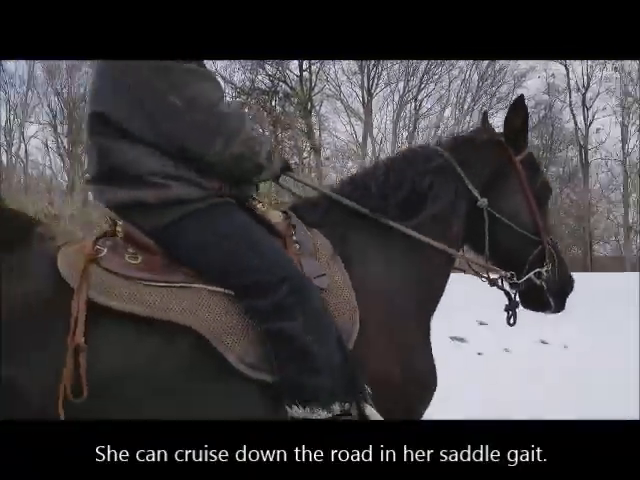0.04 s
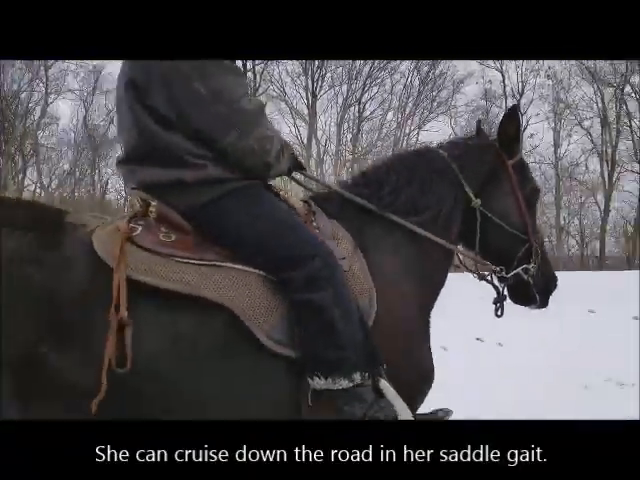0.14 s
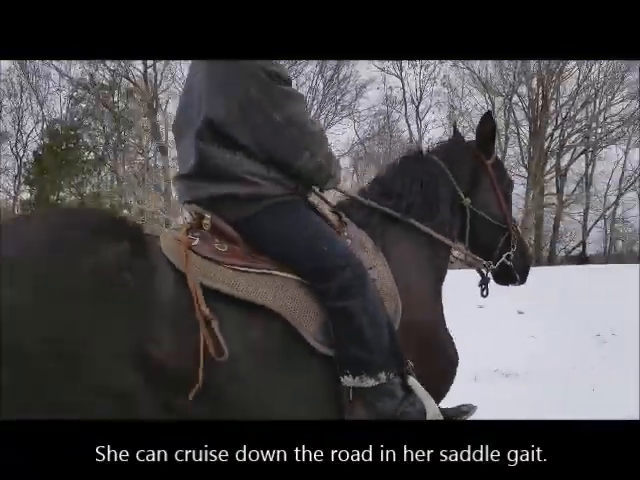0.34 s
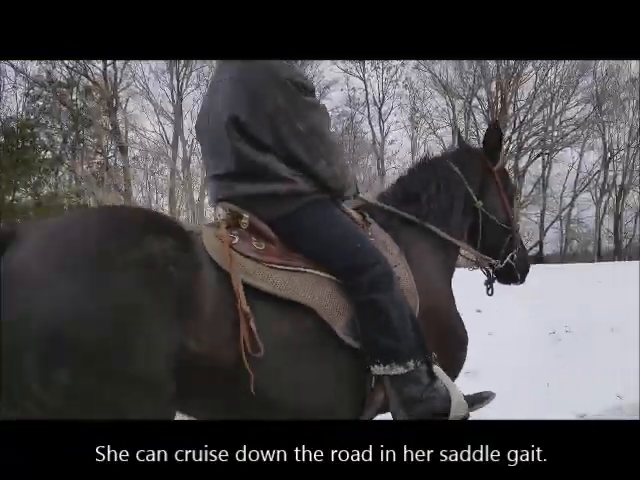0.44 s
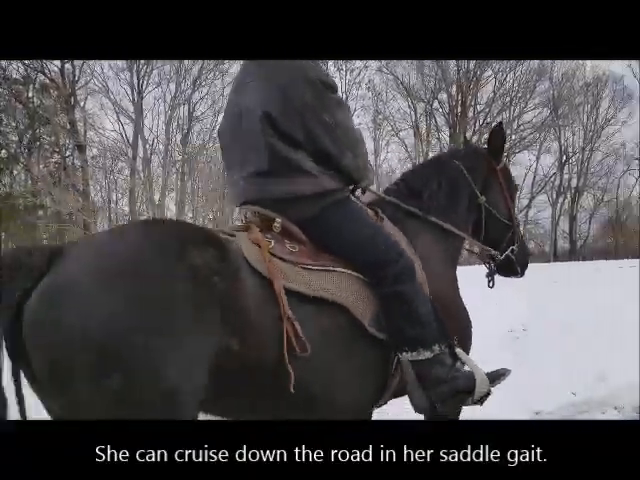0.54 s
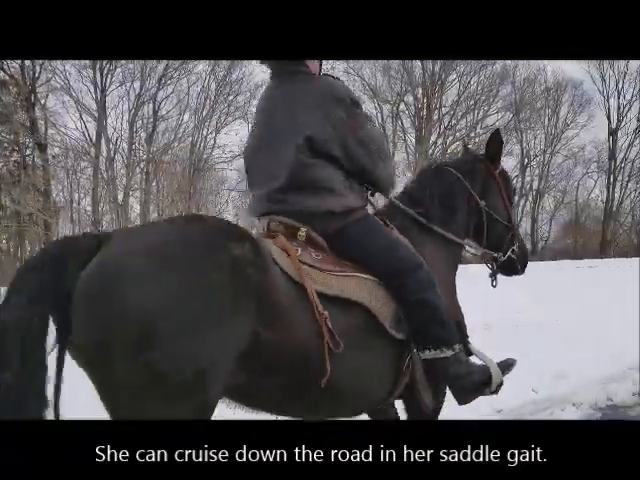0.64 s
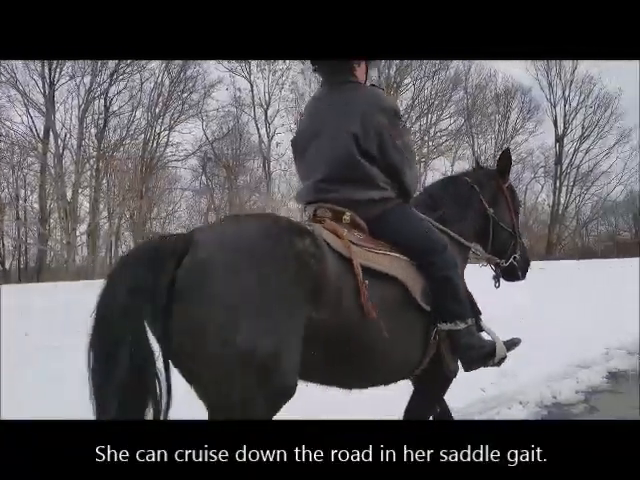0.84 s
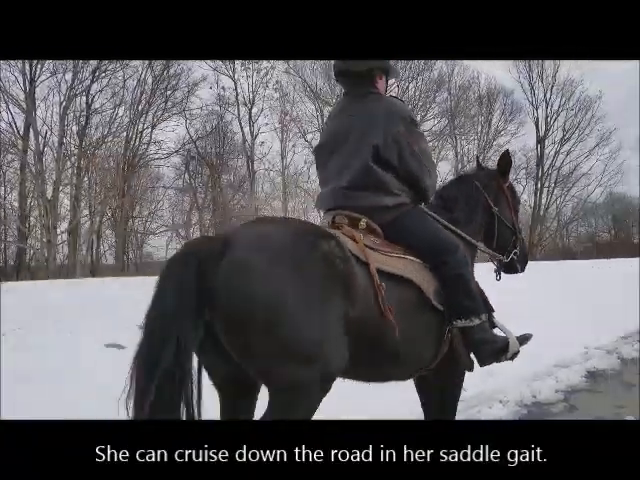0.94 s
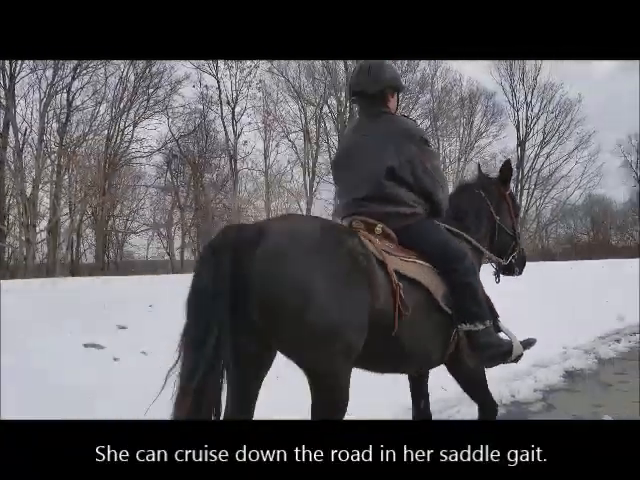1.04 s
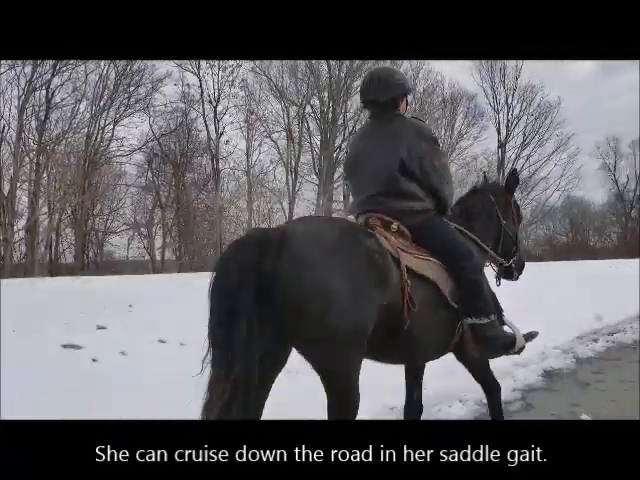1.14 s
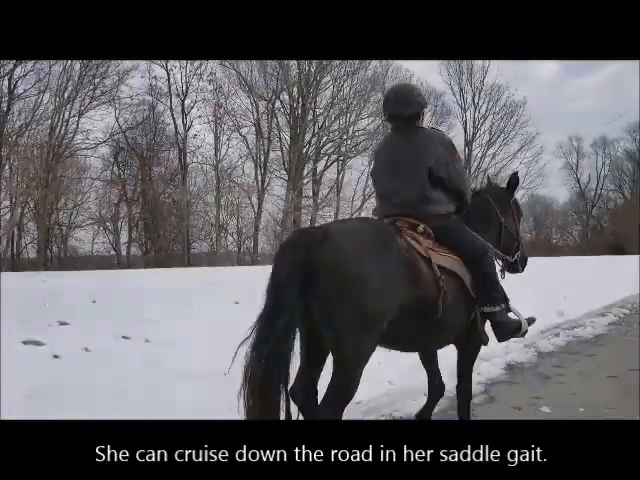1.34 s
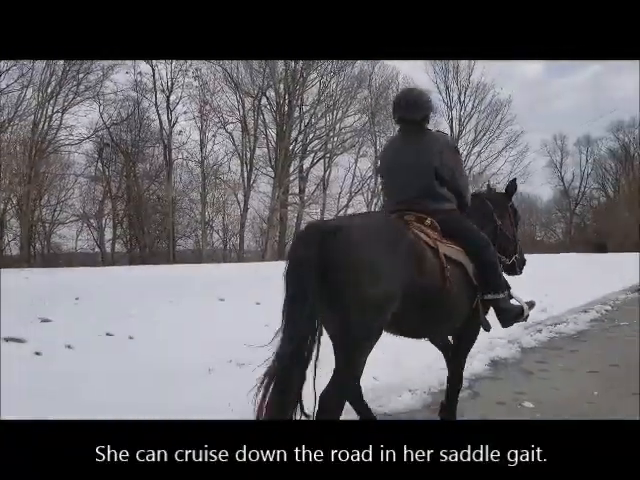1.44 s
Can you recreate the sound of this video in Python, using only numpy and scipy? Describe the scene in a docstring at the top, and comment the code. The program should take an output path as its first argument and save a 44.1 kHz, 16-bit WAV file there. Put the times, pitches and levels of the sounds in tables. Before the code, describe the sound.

A horse walks close by on pavement, hooves clopping in pairs with light gritty crunches.

```python
"""A gaited horse passes close by on a paved road between snowy fields, its hooves landing in four pairs.
Each hoof touches, then slaps flat: the hollow hoof rings, the sole knocks, the weight thuds.
Road grit crackles under the shoes, and one hoof scuffs through it. The saddle rustles, coat and
leather swish, and a metal clasp tinkles on the reins. Road and trees throw back a faint tail.
Underneath lies a bed of outdoor hiss and low rumble."""
import sys
import numpy as np
from scipy import signal
from scipy.fft import rfft, irfft, next_fast_len
from scipy.io import wavfile
from scipy.ndimage import map_coordinates

SR = 44100
rng = np.random.default_rng(int(sys.argv[2]) if len(sys.argv) > 2 else 0)


def output_pcm(signal):
    """Save a mono or channel-first signal as 16-bit PCM at the path in sys.argv[1].

    Samples are clipped to [-1, 1] before scaling.
    """
    pcm = np.clip(np.atleast_2d(signal).T, -1, 1) * 32767
    wavfile.write(sys.argv[1], SR, np.round(pcm).astype(np.int16))


N = 66150

# EQ curves of the noise layers (frequency [Hz], gain [dB])
HISS_EQ = [(30, -2.5), (100, -2), (200, -6), (400, -16), (650, -17.5), (1000, -25), (1900, -28),
           (2700, -31), (5200, -17), (8400, -26), (11000, -25), (12500, -29.5), (16000, -29.5)]
RUMBLE_EQ = [(30, -28.5), (65, -12.5), (82, -12.5), (100, -24), (200, -39), (600, -76.5)]
RUSTLE_EQ = [(80, -24.5), (170, -12.5), (300, -7.5), (450, -12.5), (700, -13), (2000, -22), (5000, -39),
             (15000, -34.5)]
SWISH_EQ = [(200, -23.5), (500, 1.5), (1300, -7), (2000, -4), (3200, -7.5), (5000, -6.5), (15000, -32)]
GRIT_EQ = [(300, -17), (900, -8.5), (1700, -7.5), (2700, -11.5), (4400, -2), (7500, -5), (11000, -11),
           (15500, -17)]
SHUDDER_EQ = [(40, -20), (80, -11.5), (150, -4.5), (290, -0.5), (480, -10.5), (1000, -14), (2000, -21.5),
              (5000, -38.5), (15000, -69.5)]
CRACK_EQ = [(100, -7), (450, -4.5), (900, -1.5), (1350, 3.5), (1750, -0.5), (2300, 2.5), (2900, -9.5),
            (6000, -18), (10000, -26.5), (16000, -37.5)]
# fader rides of the background layers (time [s], level [dB])
HISS_FADER = [(0, -55.5), (0.42, -57.5), (0.8, -56.5), (1.1, -57), (1.48, -54)]
RUMBLE_FADER = [(0, -67), (0.8, -60), (1.1, -57.5), (1.35, -50.5), (1.48, -68)]
RUSTLE_FADER = [(0, -58), (0.11, -50.5), (0.2, -57), (0.33, -56.5), (0.42, -76.5), (0.7, -78)]
SWISH_FADER = [(0, -62), (0.18, -55.5), (0.36, -59), (0.55, -59.5), (0.66, -51), (0.74, -70), (0.85, -59.5),
               (1.0, -58), (1.15, -63.5), (1.33, -56), (1.48, -76.5)]
# stereo image of hiss, rustle and swish (frequency [Hz], left-right correlation [-1 to 1])
STEREO_IMAGE = [(60, 0.81), (180, 0.79), (550, 0.57), (1650, 0.065), (4970, -0.12), (15000, -0.26)]
# taps of the rein clasp (time [s], level [dB])
CLASP_TAPS = [(0.066, -61.5), (0.151, -71.5), (0.251, -67), (0.278, -60), (0.462, -68), (0.515, -62),
              (0.622, -66), (0.653, -65), (0.741, -69)]
# partials of the clasp (frequency [Hz], gain [dB], t60 [s])
CLASP_MODES = [(14300, 4.5, .17), (15100, -14, .1)]
# decay of the tail from the trees (frequency [Hz], t60 [s])
TAIL_DECAY = [(100, 0.53), (400, 0.6), (1100, .22), (3000, 0.63), (12000, 0.05)]
# pan of the horse (time [s], hoof left over right [dB], grit left over right [dB], left lead [ms])
HORSE_PAN = [(0.2, 0.6, 17, 0.12), (0.6, -0.5, 2.5, 0.11), (0.9, 0, -0.5, -0.063), (1.2, -1, 0, -.14),
             (1.45, 3, -8.5, -0.099)]
# bursts of grit underfoot (time [s], level [dB], attack [s], t60 [s])
GRIT_BURSTS = [(0.182, -45.5, 0.0028, 0.023), (0.2184, -49.5, 0.00065, 0.082),
               (0.2548, -49.5, 0.00082, .03), (0.2873, -47, 0.00045, 0.019), (0.3486, -47, 0.00028, 0.021),
               (0.5041, -44, 0.0011, 0.0187), (0.514, -44.5, 0.0038, 0.11), (0.6140, -56, .002, .15),
               (0.6731, -42.5, 0.0011, 0.022), (0.7717, -51, 0.00079, 0.042), (0.8613, -47, 0.00044, 0.015),
               (0.8835, -34.5, .001, 0.043), (0.9562, -56, 0.00034, 0.018), (0.9741, -49.5, 0.00035, 0.01),
               (0.988, -44, 0.00049, 0.018), (1.2000, -21, 0.00021, 0.04), (1.2036, -26, 0.00055, .016),
               (1.2200, -37, 0.0047, .09), (1.2735, -42.5, .004, .09), (1.287, -45.5, 0.0052, 0.14),
               (1.3330, -43.5, .0003, .022), (1.3600, -43, 0.0033, 0.093), (1.3763, -40, .001, 0.018),
               (1.4739, -43, .003, 0.025)]
# resonances of the scraped shoe (frequency [Hz], width [Hz], gain [dB])
SHOE_MODES = [(1690, 310, -13.5), (3590, 320, -3.5), (4466, 130, 1), (5240, 360, -0.5), (7650, 340, -4.5),
              (10660, 370, -11.5)]
# dead modes of the sole (pitch [x knock pitch], gain [dB], time to peak [s])
SOLE_MODES = [(1, -6, 0.0015), (.36, -10.5, 0.0027)]
# modes of the hollow hoof (pitch [x ring pitch], gain [dB], base t60 [s])
HOOF_MODES = [(1, 2, 0.027), (.68, -34, .028), (1.28, -13, 0.009), (1.57, -41, 0.036), (2.15, -22.5, .02)]
# hoof hits on the road (time [s], ring [dB], ring pitch [Hz], ring length [x base t60], knock [dB],
# knock pitch [Hz], thud [dB], settled thud pitch [Hz], crack [dB])
HOOF_HITS = [ (0.2109, -32.5, 1150, 1.2, -25, 900, -37.5, 178, -32.5),
             (0.2197, -4, 1081, 1.12, -11.5, 868, -17, 127.8, -22),
             (0.2570, -41, 1200, .7, -42.5, 750, -46, 125, -54),
             (0.2733, -46.5, 1120, 0.68, -20.5, 700, -23.5, 250.7, -54),
             (0.2772, -19, 1230, 0.64, -61, 800, -28.5, 100, -38),
             (0.2855, -13.5, 1175, 0.78, -21, 854, -32, 97, -32.5),
             (0.502, -46, 1100, 0.51, -38, 800, -43.5, 130, -48),
             (0.5190, -29.5, 1180, 0.44, -26, 740, -37.5, 151, -39),
             (0.5301, -30.5, 1100, 0.43, -29, 680, -25, 114, -48.5),
             (0.5660, -62.5, 1100, 0.67, -60, 700, -43, 115, -71),
             (0.6011, -24, 1293, 0.66, -24, 850, -34, 220, -36.5),
             (0.6137, -18.5, 1170, .5, -14.5, 790, -22, 118.6, -27.5),
             (0.6445, -64, 1200, .6, -55, 700, -39, 125, -43),
             (0.87, -47.5, 1150, 1.1, -33, 800, -38, 180, -41.5),
             (0.8829, -7, 1067, 0.84, -13, 838, -19.5, 114.5, -22),
             (0.9478, -28, 1207, 1, -17.5, 630, -27.5, 203, -45.5),
             (0.9560, -16.5, 1170, 0.68, -42, 700, -30.5, 131, -27),
             (1.2099, -45, 1160, 0.68, -23, 384, -28.5, 167, -39),
             (1.2239, -38.5, 1090, 0.83, -24, 510, -29, 89.7, -31.5),
             (1.2281, -23.5, 1110, 1, -22.5, 864, -32.5, 174, -34),
             (1.2388, -50.5, 1240, .5, -45, 810, -55.5, 101, -31),
             (1.2906, -39, 1364, 1.5, -26.5, 528, -35.5, 205, -40),
             (1.2990, -48, 1300, 0.54, -46, 780, -36, 166.6, -53),
             (1.3345, -62.5, 1110, 0.68, -63.5, 810, -69, 85.5, -43.5)]
# tone tilt between the microphone ports (frequency [Hz], left over right [dB])
PORT_TILT = [(100, 0), (800, 0), (1300, 1), (2000, 12.5), (2500, 1), (3100, 4), (4400, 2.5), (5500, 5.5),
             (6800, -9.5), (8200, -2), (9600, -7.5), (11000, -12), (12500, -1), (14000, 7), (15500, 5.5)]

CLASP_RIGHT_DB = -11.5
TAIL_DB, SCATTER_DB = -30, -25
SHOE_DB, GRAIN_DEPTH_DB, GRAINS_PER_S = 0.5, 4.5, 4700
THUD_SAG, THUD_SAG_S, SHUDDER_DB = .7, .004, -10  # the thud starts 70% sharp
RING_BEND, RING_BEND_S, RING_WAVER_RAD = .55, .00041, .14  # the ring starts 55% flat
LOW_CUT_HZ, TOP_HZ = 45, 15950
HIT_N = SR // 6  # samples in a one-shot


def amp(db):
    """Decibels to gain."""
    return 10 ** (np.asarray(db) / 20)


def unit(x):
    """Scale to rms 1."""
    return x / np.sqrt(np.mean(x ** 2) + 1e-20)


def along(points, hz):
    """Read (frequency [Hz], value) points on a log axis."""
    freqs, values = np.transpose(points)
    return np.interp(np.log(hz + 1), np.log(freqs + 1), values)


def ride(fader):
    """A fader's level in dB at every sample."""
    return np.interp(np.arange(N) / SR, *np.transpose(fader))


def wobble(rate, size):
    """A smooth random curve, rate knots a second."""
    return map_coordinates(rng.standard_normal(size), [np.arange(size) * rate / SR], mode="wrap")


def filtered(x, response):
    """Filter x with a complex frequency response."""
    n = x.shape[-1]
    padded = next_fast_len(n + SR // 8)
    return irfft(rfft(x, padded) * response(np.fft.rfftfreq(padded, 1 / SR)), padded)[..., :n]


def strike(t, attack, t60):
    """Envelope of a hard hit: quick rise, exponential fall."""
    return (1 - np.exp(-t / attack)) * np.exp(-np.log(1000) * t / t60)


def swell(t, peak_s):
    """Envelope of a cushioned hit: soft start, 1 at peak_s, quick end."""
    return (t / peak_s) ** 2 * np.exp(2 - 2 * t / peak_s)


def eq_noise(eq, shape):
    """Coloured noise of rms 1."""
    return unit(filtered(rng.standard_normal(shape), lambda hz: amp(along(eq, hz))))


def stereo_noise(eq, image=STEREO_IMAGE):
    """Coloured noise of rms 1, its width set band by band."""
    def mid_side_gains(hz):
        angle = np.arccos(np.clip(along(image, hz), -1, 1)) / 2
        return amp(along(eq, hz)) * [np.cos(angle), np.sin(angle)]
    mid, side = filtered(rng.standard_normal((2, N)), mid_side_gains)
    return unit(np.array([mid + side, mid - side]))


def pan_in(out, x, at, gritty):
    """Mix in a one-shot, panned by level and delay to where the horse then is."""
    times, *columns = np.transpose(HORSE_PAN)
    hoof_db, grit_db, lead_ms = [np.interp(at, times, column) for column in columns]
    sides, preroll = np.array([[.5], [-.5]]), SR // 200
    gains = amp(sides * (grit_db if gritty else hoof_db))
    padded = np.pad(x, [(0, 0), (preroll, 0)])
    pair = filtered(padded, lambda hz: gains * np.exp(2j * np.pi * hz * sides * lead_ms / 1000))
    start = round(at * SR) - preroll
    out[:, start:start + pair.shape[1]] += pair[:, :N - start]


def outdoor_bed():
    """Faint, wide hiss over a low, almost mono rumble."""
    hiss = amp(ride(HISS_FADER) + 0.46 * wobble(39.47, N)) * stereo_noise(HISS_EQ)
    rumble = amp(ride(RUMBLE_FADER)) * stereo_noise(RUMBLE_EQ, image=[(80, .99)])
    return hiss + rumble


def saddle_rustle():
    """The saddle gives a dark, fluttering rustle at the start."""
    return amp(ride(RUSTLE_FADER) + 2.5 * wobble(100, N)) * stereo_noise(RUSTLE_EQ)


def coat_swish():
    """Coat and leather rub in soft midrange swells."""
    return amp(ride(SWISH_FADER) + 2.4 * wobble(150, N)) * stereo_noise(SWISH_EQ)


def rein_clasp():
    """The metal clasp rings thinly on the left as the head nods."""
    out, t = np.zeros(N), np.arange(HIT_N) / SR
    for at, tap_db in CLASP_TAPS:
        for hz, db, t60 in CLASP_MODES:
            partial = np.sin(2 * np.pi * hz * t + .5 * wobble(200, HIT_N))
            out[round(at * SR):][:HIT_N] += amp(tap_db + db) * strike(t, 0.0045, t60) * partial
    return np.array([out, amp(CLASP_RIGHT_DB) * out])


def reflections(x):
    """Reverb return: a quick scatter off road and horse, and a faint tail from the trees."""
    freqs, t, bands = signal.stft(rng.standard_normal((2, SR // 2)), SR, nperseg=256)
    decay = np.exp(-np.log(1000) * t / along(TAIL_DECAY, freqs)[:, None])
    tail = signal.istft(bands * decay, SR, nperseg=256)[1]
    scatter = rng.standard_normal(tail.shape) * strike(np.arange(tail.shape[1]) / SR, .012, t60=.045)
    impulse = amp(TAIL_DB) * tail / np.linalg.norm(tail[0])
    impulse += amp(SCATTER_DB) * scatter / np.linalg.norm(scatter[0])
    mid, side = impulse[0], filtered(impulse[1], lambda hz: hz / (hz + 900))  # lows stay centred
    return signal.fftconvolve(x, np.array([mid + side, mid - side]), axes=1)[:, :N]


def grit():
    """Tiny grains are crushed between shoe and road, and the scraped shoe rings."""
    def colour(hz):
        shoe = sum(amp(db) * 1j * hz * width / (centre ** 2 - hz ** 2 + 1j * hz * width)
                   for centre, width, db in SHOE_MODES)
        return amp(along(GRIT_EQ, hz)) + amp(SHOE_DB) * shoe
    out, t = np.zeros((2, N)), np.arange(HIT_N) / SR
    for at, db, attack, t60 in GRIT_BURSTS:
        noise = rng.standard_normal((3, HIT_N)) * amp(GRAIN_DEPTH_DB * wobble(GRAINS_PER_S, HIT_N))
        grains = unit(filtered(noise[0] + noise[1:], colour))  # centre plus left and right
        pan_in(out, amp(db) * strike(t, attack, t60) * grains, at, gritty=True)
    return out


def road_crack(t):
    """The hoof's sharp transient on the asphalt, wider in the highs."""
    noise = eq_noise(CRACK_EQ, (3, len(t)))
    edges = filtered(noise[1:], lambda hz: hz / (hz + 2000))
    return strike(t, attack=.0004, t60=.022) * (noise[0] + edges)


def weight_thud(t, hz):
    """The low end sags in pitch as the weight settles; leg and tack shudder with it."""
    sagging = t + THUD_SAG * THUD_SAG_S * (1 - np.exp(-t / THUD_SAG_S))
    shudder = strike(t, attack=.0022, t60=.088) * eq_noise(SHUDDER_EQ, len(t))
    return swell(t, peak_s=.0066) * np.sin(2 * np.pi * hz * sagging) + amp(SHUDDER_DB) * shudder


def sole_knock(t, hz):
    """The damped sole gives a short, dead knock."""
    return sum(amp(db) * swell(t, peak_s) * np.sin(2 * np.pi * hz * ratio * t)
               for ratio, db, peak_s in SOLE_MODES)


def hoof_ring(t, hz, length):
    """The clop: its pitch scoops up as the hollow of the hoof closes on the road."""
    bent = t - RING_BEND * RING_BEND_S * (1 - np.exp(-t / RING_BEND_S))
    ring = np.zeros(len(t))
    for ratio, db, t60 in HOOF_MODES:
        phase = 2 * np.pi * hz * ratio * bent + RING_WAVER_RAD * wobble(400, len(t))
        ring += amp(db) * strike(t, attack=.0007, t60=length * t60) * np.sin(phase)
    return ring


def hooves():
    """Every hit on the road stacks four layers: ring, knock, thud and crack."""
    out, t = np.zeros((2, N)), np.arange(HIT_N) / SR
    for at, ring_db, ring_hz, length, knock_db, knock_hz, thud_db, thud_hz, crack_db in HOOF_HITS:
        ring = amp(ring_db) * hoof_ring(t, ring_hz, length)
        knock = amp(knock_db) * sole_knock(t, knock_hz)
        thud = amp(thud_db) * weight_thud(t, thud_hz)
        crack = amp(crack_db) * road_crack(t)
        pan_in(out, crack - ring - knock - thud, at, gritty=False)
    return out


def scene():
    """The mix: hooves and grit up front with their reverb, tack and outdoor bed behind."""
    steps = hooves() + grit()
    return steps + reflections(steps) + rein_clasp() + outdoor_bed() + saddle_rustle() + coat_swish()


def record(dry):
    """The microphone thins the deep bass and cuts the very top; its two ports differ in colour."""
    thinned = signal.sosfilt(signal.butter(2, LOW_CUT_HZ, "high", fs=SR, output="sos"), dry)
    sides = np.array([[.5], [-.5]])
    return filtered(thinned, lambda hz: amp(sides * along(PORT_TILT, hz)) * (hz < TOP_HZ))


dry = scene()
out = record(dry)
output_pcm(out)
```